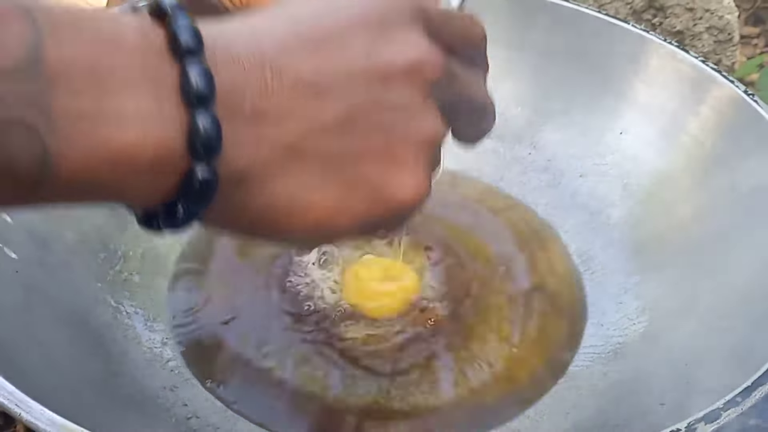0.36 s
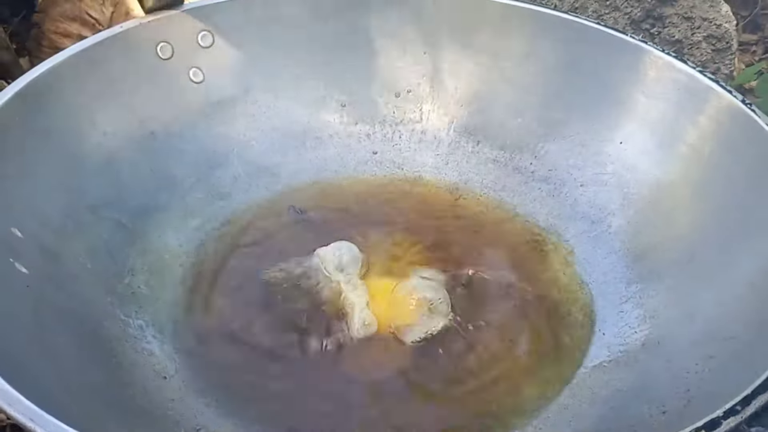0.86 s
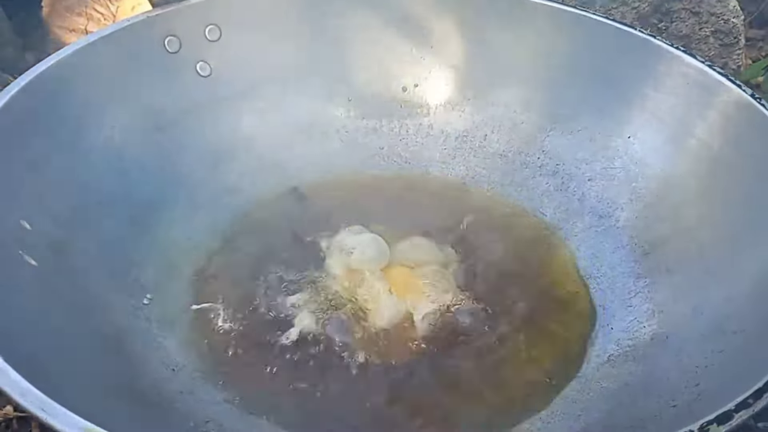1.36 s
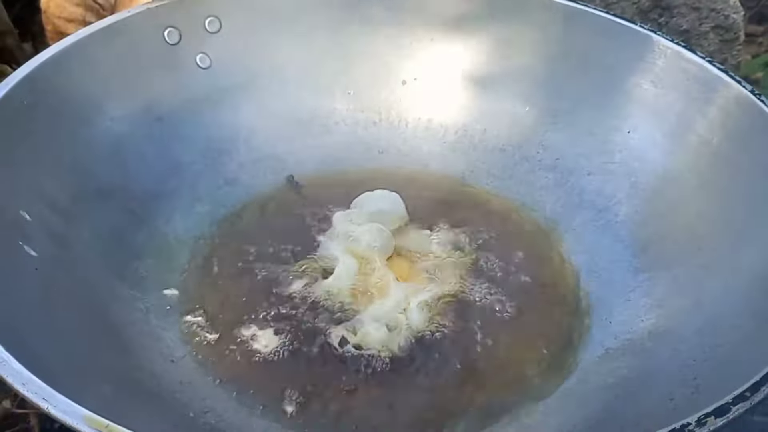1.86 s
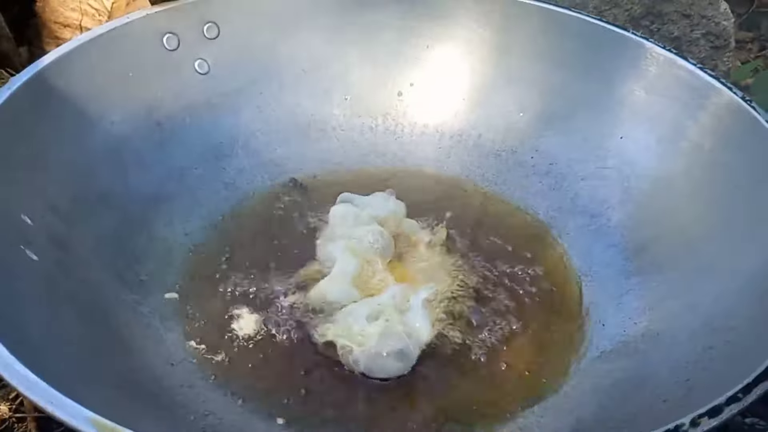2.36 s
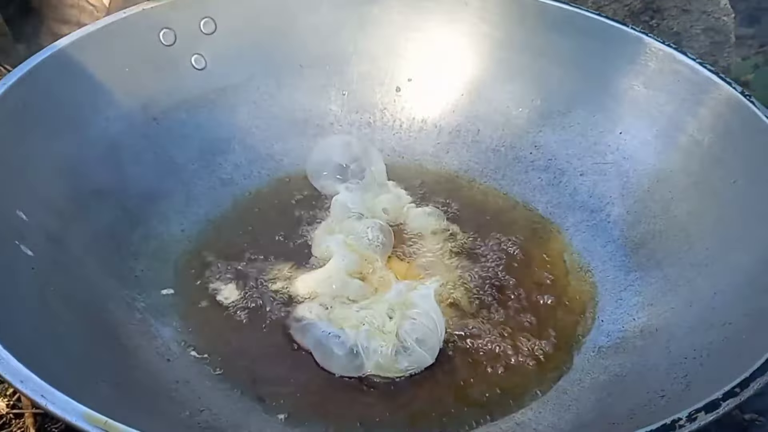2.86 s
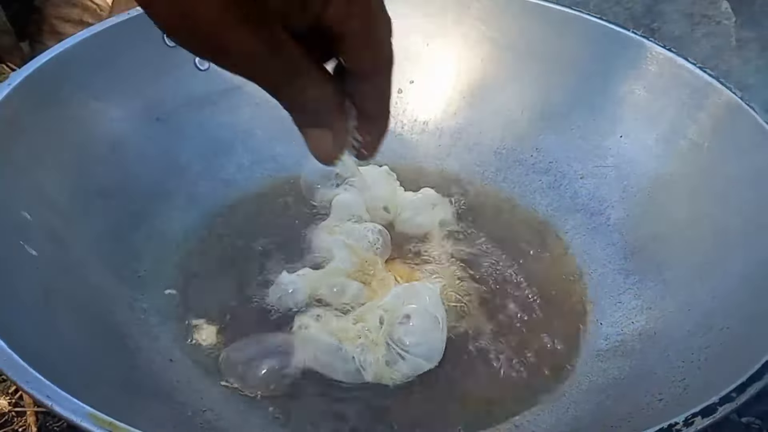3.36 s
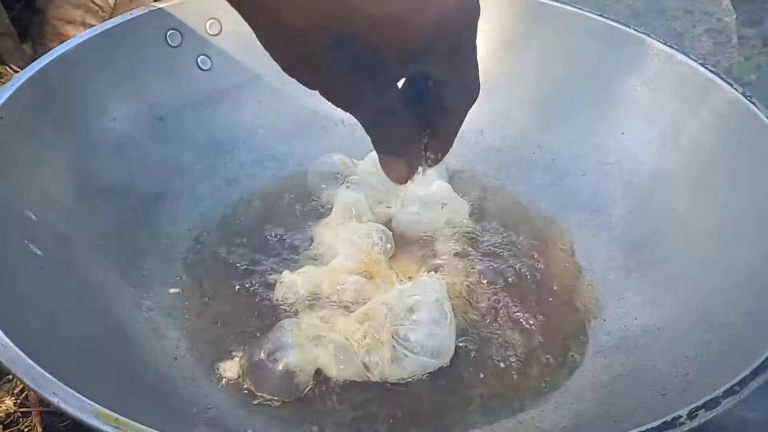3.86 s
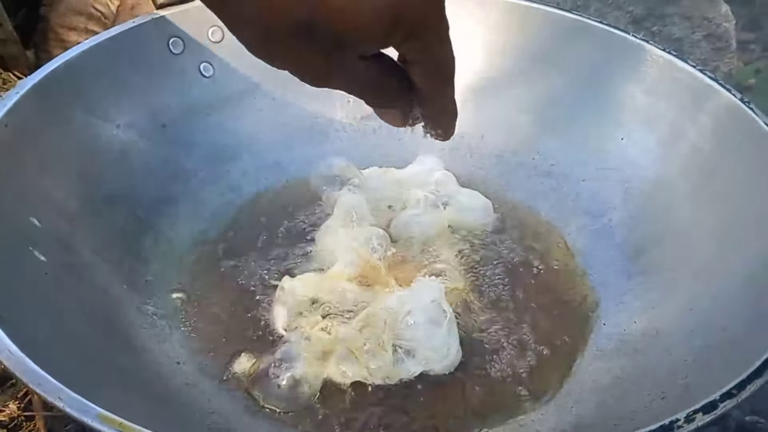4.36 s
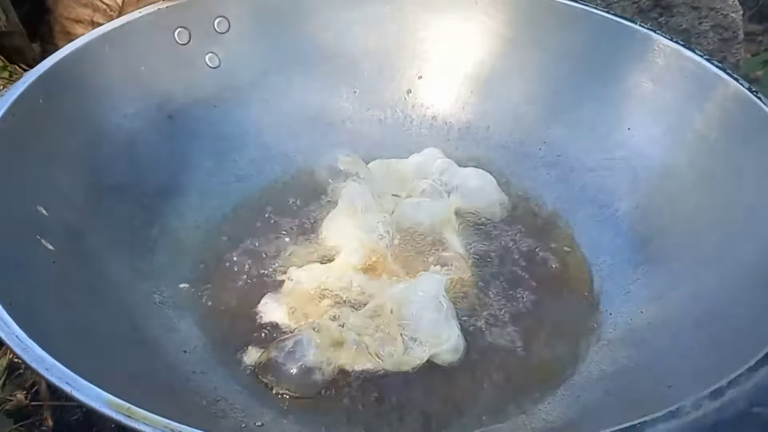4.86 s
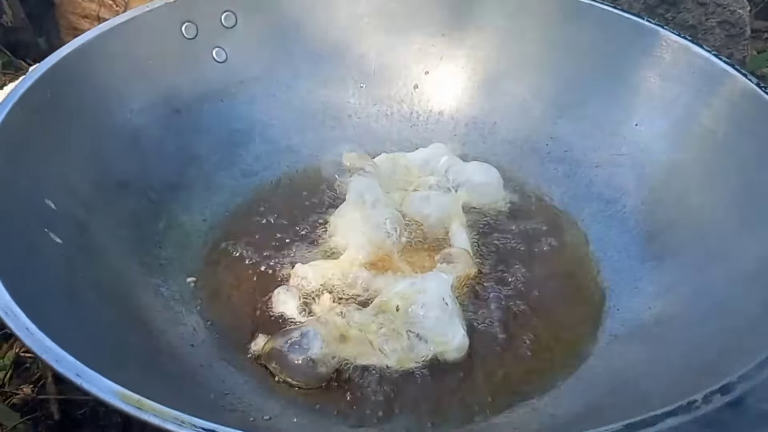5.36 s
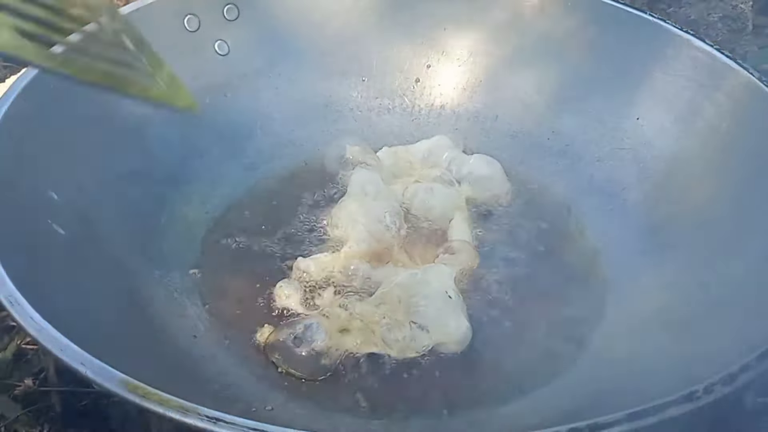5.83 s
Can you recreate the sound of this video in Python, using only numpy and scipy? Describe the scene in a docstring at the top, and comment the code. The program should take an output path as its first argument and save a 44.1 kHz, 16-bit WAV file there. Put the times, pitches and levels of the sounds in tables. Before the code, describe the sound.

Eggshell cracks with small hollow ticks over faintly fizzing oil, then the egg drops in and a dense, spitting sizzle erupts outdoors.

```python
"""A shell cracks in small hollow ticks over faintly fizzing oil; then an egg meets the oil and a dense, spitting sizzle
erupts, with popping bubbles and soft thumps of air. Two unlike microphone ports sit close to a wide metal pan outdoors.
Water flashing to steam is modelled as noise gated by tiny pops, power bursts for spits, and short rings for large
bubbles; trapped steam hums near one pitch. Low noise buffets the ports, and one droplet shoves the right one."""
import sys
import numpy as np
from scipy import signal
from scipy.fft import rfft, irfft
from scipy.io import wavfile
from scipy.ndimage import uniform_filter1d

SR = 44100
rng = np.random.default_rng(int(sys.argv[2]) if len(sys.argv) > 2 else 0)


def voltage_ratio(decibels):
    """Convert decibels (scalar or array-like) to amplitude ratios, 20 dB per decade."""
    exponent = np.asarray(decibels, float) / 20
    return 10 ** exponent


def dump(signal):
    """Clip the signal to [-1, 1] and save it as 16-bit WAV at the path in sys.argv[1]."""
    limited = np.clip(np.atleast_2d(signal).T, -1, 1)
    pcm = np.round(limited * 32767).astype(np.int16)
    wavfile.write(sys.argv[1], SR, pcm)


N = 263277
T = np.arange(N) / SR
HZ = np.fft.rfftfreq(N, 1 / SR) + 1  # the added 1 Hz keeps logarithms finite
SIDES = np.array([[.5], [-.5]])  # shares a left-minus-right difference in dB between the ports


def on_log(table, hz):
    """Logarithmic interpolation: reads a (Hz, value) table on a log-frequency axis."""
    return np.interp(np.log(hz), np.log(np.array(table)[:, 0]), np.array(table)[:, 1])


def unit(x):
    """Root-mean-square normalisation to 1."""
    return x / np.sqrt(np.mean(x ** 2))


def walk(rate):
    """Low-pass random modulation: levels held 1 / rate s and smoothed twice, rms 1."""
    hold = int(SR / rate)
    levels = np.repeat(rng.standard_normal(N // hold + 1), hold)
    return unit(uniform_filter1d(uniform_filter1d(levels, hold), hold)[:N])


def add(out, s, x):
    """Superposition: mixes x into out from time s."""
    i = int(np.clip(s * SR, 0, N))
    out[..., i:i + x.shape[-1]] += x[..., :N - i]


def ring(hz, length_s, glide):
    """Damped resonance: swells fast and dies slower, its pitch gliding steadily; envelope peak 1."""
    u = np.arange(int(3 * length_s * SR) + 2) / SR / (0.39 * length_s)  # 1 at the peak
    phase = 2 * np.pi * np.cumsum(hz * (1 + glide * (u - 1))) / SR
    return u * np.exp(1 - u) * np.sin(phase)


def crackle(rate, spread_db, fade_ms):
    """Shot noise: a gate of tiny pops at random times and of scattered size, each decaying exponentially."""
    size = voltage_ratio(spread_db * np.clip(rng.standard_normal(N), -2, 2))
    pops = size * (rng.random(N) < rate / SR)
    return unit(signal.lfilter([1], [1, -np.exp(-1000 / (fade_ms * SR))], pops))


def narrow(table, rate, pan_db, alike):
    """Quadrature modulation: slow noise on a carrier makes a narrow band whose centre and level follow the table."""
    s, hz, db = np.transpose(table)
    phase = 2 * np.pi * np.cumsum(np.interp(T, s, hz)) / SR
    both, left, right = (walk(rate) * np.sin(phase) + walk(rate) * np.cos(phase) for _ in range(3))
    level = voltage_ratio(np.interp(T, s, db, -120, -120) + SIDES * pan_db)
    return level * (alike * both + (1 - alike) * np.array([left, right]))


# Puffs of warm air. Each row: centre in seconds, level in dB before the common 5 dB lift,
# half-width in seconds (to 1/e of the power), left minus right in dB.
AIR_PUFFS = [(.25, -58, .05, -8), (0.5, -54, 0.12, -4), (0.807, -48, 0.059, -1), (1.063, -43.5, 0.05, 5),
             (1.205, -48, 0.033, -1), (1.436, -50.5, 0.083, 4), (1.75, -54, 0.048, 14),
             (2.05, -53, 0.27, -2), (2.5, -48, 0.035, -4), (2.685, -46, .018, 10), (2.845, -46, 0.017, 16),
             (2.884, -46, 0.018, 20), (2.963, -52, 0.014, 13), (3.05, -56.5, .1, 17),
             (3.384, -44, 0.031, 8), (3.546, -49.5, 0.087, 21.5), (3.836, -54, 0.019, 24),
             (4.032, -50.5, 0.06, 4), (4.14, -50, 0.024, -12), (4.322, -52, 0.046, 2),
             (4.503, -49.5, 0.052, 6), (4.77, -53, 0.065, 21), (5.876, -51, 0.029, -3)]
# Droplet landing on the right port. Each row: time in seconds, push in dB, delay of the spreading in ms,
# spreading in dB relative to the push.
DROPLET_PUSH = [(2.6040, 1.5, 7.8, -11)]
# The steady breeze: level at the start before the common lift, its drift, left minus right, wander
BREEZE_DB, BREEZE_FADE_DB_S, BREEZE_PAN_DB, BREEZE_WALK_DB = -56.5, -0.57, -2.5, 3


def port_air():
    """Turbulent pressure on the membranes: gusty rumble, partly unrelated left and right, and the droplet's shove."""
    breeze_db = BREEZE_DB + BREEZE_FADE_DB_S * T + SIDES * BREEZE_PAN_DB + BREEZE_WALK_DB * walk(13)
    power = voltage_ratio(2 * breeze_db)
    for s, db, length, pan in AIR_PUFFS:
        power = power + voltage_ratio(2 * (db + SIDES * pan)) * np.exp(-((T - s) / length) ** 2)
    eddies = rng.standard_normal((2, N)) + 1.4 * rng.standard_normal(N)
    rumble = signal.sosfilt(signal.butter(4, 135, fs=SR, output="sos"), eddies)
    gusts = np.sqrt(power) * voltage_ratio(0.86 * np.array([walk(12), walk(26)]))

    s, db, spread_ms, spread_db = DROPLET_PUSH[0]
    # it lands at once, then spreads and presses a little more
    landing = np.clip((T - s) / 0.0003, 0, 1)
    spread = np.sin(np.pi / 2 * np.clip((T - s - spread_ms / 1000) / 0.0087, 0, 1)) ** 2
    push = voltage_ratio(db) * (landing + voltage_ratio(spread_db) * spread)
    return voltage_ratio(5.0) * unit(rumble) * gusts - push * np.array([[.03], [1]])


# Frying levels before flicker. Each row: time in seconds, fizz in dB, gurgle in dB, bubbling in dB, steam hiss in dB.
FRY_LEVELS = [(0, -66, -78, -80, -63), (.19, -63.5, -82, -72, -71.5), (.28, -50, -84, -76, -57),
              (.315, -35.5, -75, -62, -44), (.335, -31, -57, -46, -40), (.46, -32.5, -49.5, -35.5, -42),
              (.58, -28, -42.5, -34, -38), (.72, -27.5, -43.5, -37, -37.5), (.86, -29, -42.5, -34.5, -39.5),
              (1.08, -30, -38.5, -33.5, -37.5), (1.45, -30, -41.5, -37.5, -37),
              (2.06, -32.5, -45, -37, -40), (2.43, -31.5, -44.5, -37, -35.5), (2.62, -31.5, -45, -39, -42),
              (3.01, -36.5, -48.5, -43.5, -38), (3.4, -36, -49.5, -43, -39), (3.56, -34, -48, -43, -43),
              (3.77, -36.5, -53.5, -40.5, -37.5), (4.04, -30.5, -52, -42, -34.5),
              (4.2, -29.5, -50.5, -36.5, -31.5), (4.33, -24.5, -53.5, -37, -28.5),
              (4.41, -24.5, -51, -35, -28), (4.52, -23.5, -49.5, -34.5, -29.5),
              (4.63, -29, -52.5, -40.5, -32.5), (4.72, -26, -56, -37.5, -28.5),
              (4.89, -22.5, -47.5, -32.5, -32.5), (4.93, -30, -53.5, -34.5, -34),
              (5.4, -34.5, -57.5, -43, -36), (5.52, -34.5, -54.5, -41, -39), (5.61, -36, -47, -43.5, -40),
              (5.8, -40, -59.5, -47.5, -40.5), (5.88, -35.5, -47.5, -43, -38),
              (5.97, -40.5, -53, -47.5, -43)]
# The burble lies between gurgle and bubbling, and comes up only as the white sets
BURBLE_SHARE, BURBLE_DB, RAW_DB, SETTING_S = 0.21, -2, -33, 0.96
FIZZ = 3  # place of the fizz among the five bubble sizes


def boil():
    """Bubble-size distribution: levels of five sizes, large to small, sample by sample (dB)."""
    s, *cols = np.transpose(FRY_LEVELS)
    fizz, gurgle, bubbling, hiss = (np.interp(T, s, c) for c in cols)
    raw_db = RAW_DB * np.exp(-(T / SETTING_S) ** 2)
    burble = gurgle + BURBLE_SHARE * (bubbling - gurgle) + BURBLE_DB + raw_db
    return [gurgle, burble, bubbling, fizz, hiss]


DENSE_DB, BLUR = -30.5, 0.54  # in a fizz louder than this, single grains stand out less, dB per dB


def blur(fizz_db):
    """Overlap of grains: the loss of prominence of the lesser ones in a dense boil (dB)."""
    return -BLUR * np.clip(fizz_db - DENSE_DB, 0, None)


# Spectral colour of the frying. Each row: frequency in Hz, relative density in dB per Hz.
FRY_SPECTRUM = [(120, -41), (200, -19), (283, -22), (316, -20.5), (360, -13.5), (394, -18.5), (821, -7),
                (1180, -5), (1340, -4), (1600, -1.5), (1960, 0), (2470, 2.5), (3830, 9.5), (5520, 8),
                (7500, 2.5), (8200, -2), (9300, 0.5), (10500, -2.5), (12400, 2), (15100, -6), (16000, -4)]
# Unlike responses of the ports. Each row: frequency in Hz, left minus right in dB.
PORT_DIFFERENCE = [(250, 2.5), (700, 3), (1100, 4.5), (1500, 6.5), (2000, 4), (2700, 3), (3500, -4.5),
                   (4500, -2), (6000, -6), (7500, 4.5), (8400, -17), (9100, -27.5), (10000, -1.5),
                   (12000, -12.5), (15500, -1.5)]
# Coherence of the ports. Each row: frequency in Hz, share of power common to both.
COMMON_SHARE = [(250, 0.92), (700, 0.96), (1500, 0.62), (3000, 0.89), (6000, 0.0095), (12000, 0.19)]


def froth(gate):
    """Partial coherence: spectra at the two ports of gated noise, partly common and partly their own."""
    both, left, right = rfft(rng.standard_normal((3, N)) * unit(gate))
    alike = np.clip(on_log(COMMON_SHARE, HZ), 0, 1)
    late = np.exp(-2j * np.pi * HZ * 3.06 / SR)  # the right port is 3.06 samples further off
    common = np.sqrt(alike) * both * np.array([1 + 0 * late, late])
    pair = common + np.sqrt(1 - alike) * np.array([left, right])
    ports = voltage_ratio(SIDES * on_log(PORT_DIFFERENCE, HZ))
    return pair * voltage_ratio(on_log(FRY_SPECTRUM, HZ)) * ports / np.sqrt(np.mean(ports ** 2, axis=0))


SPIT_BODY_DB, SPIT_BODY_OCTAVES = -16, 1.35  # a dull broad part under each spit
STEAM_LAG = 0.15  # steam swells over this share of the fall
# Froth thrown up round each large bubble
SPLASH_DB, SPLASH_OCTAVES, SPLASH_RISE_MS, SPLASH_FALL_MS = -4, 0.41, 2.4, 6.6


def vents(centres, rows):
    """Addition of powers: spits and large bubbles add humps round their pitch, and spits add steam in the treble."""
    power = np.zeros((len(centres), N))

    def hump(hz, octaves):
        """Resonance curve on a log-frequency axis, its band powers summing to 1."""
        h = np.exp(-(np.log2(centres / hz) / octaves) ** 2)
        return h / h.sum()

    def puff(s, gain, rise, fall):
        """Exponential growth and decay of power, 5.6 dB in each rise or fall time (ms)."""
        ms = np.arange(-int(3 * rise * SR / 1000), int(6 * fall * SR / 1000)) / SR * 1000
        envelope = np.exp(-1.3 * np.where(ms < 0, -ms / rise, ms / fall))
        add(power, s + ms[0] / 1000, gain[:, None] * envelope)

    for s, fizz_db, hiss_db, hz, rise, fall in rows:
        octaves = 0.35 + 0.42 / (1 + rise / 6.5)  # a sudden burst is broad, a slow jet sings near its pitch
        fizz = hump(hz, octaves) + voltage_ratio(2 * SPIT_BODY_DB) * hump(hz / 2, SPIT_BODY_OCTAVES)
        puff(s, voltage_ratio(2 * fizz_db) * fizz, rise, fall)
        steam = voltage_ratio(2 * hiss_db) * (centres > 8500) / 3  # shared by the top three bands
        puff(s + STEAM_LAG * fall / 1000, steam, rise + STEAM_LAG * fall, fall)
    for s, db, hz in LARGE_BUBBLES[1:]:  # the first rises before there is any froth
        splash_db = db + SPLASH_DB + 0.56 * np.log2(hz / 1000)
        puff(s, voltage_ratio(2 * splash_db) * hump(hz, SPLASH_OCTAVES), SPLASH_RISE_MS, SPLASH_FALL_MS)
    return power


# Moments when the froth quietens. Each row: centre in seconds, level change in dB, half-width in ms (to 1/e of the dB).
FROTH_LULLS = [(1.44, -10, 11), (1.665, -4, 9.2), (1.955, -2, 14), (2.245, -4, 9), (2.308, -6, 11),
               (2.445, -3, 13), (2.625, -15, 12), (3.565, -12, 9.5), (3.765, -10, 17), (5.645, -6, 10),
               (5.7, -6, 13), (5.755, -3, 8.3)]
# The fizz turns now brighter, now duller. Each row: time in seconds, tilt in dB per octave round 4.5 kHz.
TREBLE_TILT = [(0, 2), (1, -.5), (2, 0), (3, 3), (4, 2), (4.6, -3), (5.1, 1), (5.97, 6)]
LAYER_EDGES_HZ = (560, 900, 2500, 8000)  # between the five bubble sizes
SPIT_PATCHY = 0.16  # share of the froth's flicker in a spit


def sizzle(rows):
    """Band-wise modulation: third-octaves of crackling noise, neighbours flickering together as froth flares."""
    layer_db = boil()
    pops = crackle(rate=540, spread_db=3.5, fade_ms=1.0) + 0.42 * crackle(rate=49, spread_db=10.0, fade_ms=0.37)
    # each bubble size has pops of its own besides the common ones
    own_pops = ((60.0, 1.1), (101.6, 0.8), (900, 2.9), (450, 5.8), (1500, 0.55))  # (per second, fade ms)
    sizes = [froth(0.54 + 0.21 * pops + .5 * crackle(rate=rate, spread_db=5.0, fade_ms=ms))
             for rate, ms in own_pops]
    centres = 250 * 2 ** (np.arange(19) / 3)
    layer = np.searchsorted(LAYER_EDGES_HZ, centres)
    share = voltage_ratio(2 * on_log(FRY_SPECTRUM, centres)) * centres
    patches = [walk(35) for _ in range(len(centres) + 1)]
    flicker_db = 1.6 * voltage_ratio(0.44 * blur(layer_db[FIZZ]))  # a dense boil flickers less
    lull = sum(db * np.exp(-((T - s) * 1000 / ms) ** 2) for s, db, ms in FROTH_LULLS)
    tilt = np.interp(T, *np.transpose(TREBLE_TILT))
    flare, spit, out = walk(14), vents(centres, rows), 0
    for k, hz in enumerate(centres):
        window = np.cos(np.pi / 2 * np.clip(3 * np.log2(HZ / hz), -1, 1))
        band = unit(irfft(sizes[layer[k]] * window, N))
        patch = voltage_ratio(flicker_db * (patches[k] + patches[k + 1]))
        band_db = layer_db[layer[k]] + 0.5 * flare + lull
        band_db = band_db + (layer[k] == FIZZ) * tilt * np.log2(max(hz, 3400) / 4500)
        steady = voltage_ratio(2 * band_db) * share[k] / share[layer == layer[k]].sum()
        out = out + band * np.sqrt(steady * patch ** 2 + spit[k] * patch ** (2 * SPIT_PATCHY))
    return out * voltage_ratio(SIDES * (-2.2 + 1.4 * walk(19)))  # the froth wanders a little from side to side


# Echoes across the pan. Each row: delay on the left in ms, level in dB relative to the direct sound.
PAN_ECHOES = [(1.4, -17.5), (2.9, -33), (5.3, -19.5)]


def bowl(x):
    """Specular reflection: the curved metal throws each pop back a few times, a little later on the right."""
    out = x.copy()
    for ms, db in PAN_ECHOES:
        add(out[0], ms / 1000, voltage_ratio(db) * x[0])
        add(out[1], 1.3 * ms / 1000, voltage_ratio(db) * x[1])
    return out


# Oil ticking over before the egg. Each row: time in seconds, centre in Hz, level in dB.
SIMMER_BAND = [(0, 2590, -59), (.13, 2900, -61), (.2, 3200, -74), (.3, 3170, -68)]


def simmer():
    """Narrow-band noise: the quiet oil before the egg."""
    return narrow(SIMMER_BAND, 2500, -1, 0.26)


# Shell cracking. Each row: start in seconds, level of the note in dB, pitch in Hz,
# treble in dB relative to the note, its T60 in seconds.
SHELL_CRACKS = [(.0094, -35, 2280, -16, 0.026), (0.055, -31.5, 2650, -7, 0.016),
                (.105, -58, 1250, 0.5, .02), (.112, -52, 2750, -20, .04), (0.137, -40.5, 1300, 2, 0.044),
                (0.1652, -45, 1420, -5, 0.035), (.178, -52, 1350, -10, .015), (.187, -54, 1400, -14, .015),
                (.196, -45, 1500, -14, 0.024), (.203, -48, 1500, -15, .015), (.229, -61, 1550, -20, 0.017),
                (.246, -46, 1500, -20, 0.019), (.262, -50, 1600, -20, .03), (0.291, -27, 1600, -14, .012)]
# Brittle modes. Each row: frequency in Hz, level in dB, T60 in seconds; pitch and level scatter from crack to crack.
SHELL_MODES = [(2900, 2, 0.013), (3900, -0.5, 0.023), (4800, -5, 0.017), (6170, -1, 0.018),
               (6800, -4, 0.016)]


def shell():
    """Modal decay: each crack is one short hollow note and brittle modes, each with a slightly softened onset."""
    out, t = np.zeros(N), T[:SR // 20]
    onset = 1 - np.exp(-t / 0.00052)
    for s, db, hz, tick_db, t60 in SHELL_CRACKS:
        chance = rng.standard_normal((len(SHELL_MODES), 2))
        tick = sum(voltage_ratio(g + 2 * a) * np.sin(2 * np.pi * f * (1 + .02 * b) * t) * 1000. ** (-t / d)
                   for (f, g, d), (a, b) in zip(SHELL_MODES, chance))
        split = np.diff(rng.standard_normal(len(t) + 1)) * np.exp(-t / 0.0011)
        tick = tick + 0.68 * split
        note = np.sin(2 * np.pi * hz * t) * 1000. ** (-t / t60)
        add(out, s, voltage_ratio(db) * onset * (note + voltage_ratio(tick_db) * tick))
    return out


# First thread of white touching the oil. Each row: time in seconds, centre in Hz, level in dB.
THREAD_BAND = [(.2, 3900, -70), (.21, 4000, -45), (.225, 4500, -38), (.24, 4600, -59), (.255, 5210, -41),
               (.275, 5300, -45), (0.282, 5700, -39), (.3, 4980, -32), (.318, 4630, -46), (.33, 4600, -60)]


def thread():
    """Gated narrow-band noise: a thin fizz of separate pops."""
    return narrow(THREAD_BAND, 1500, -10.0, .2) * crackle(rate=300, spread_db=2.0, fade_ms=1.7)


# Loud blisters venting. Each row: peak in seconds, fizz in dB, steam hiss in dB, rise in ms, fall in ms
# (times for 5.6 dB; the steam rises a little slower).
LOUD_SPITS = [(.207, -54, -44, .4, 3), (.222, -52, -48, 5, 6.5), (.262, -47, -50, 5.5, 10),
              (.281, -57, -44, 1, 5), (0.293, -35, -40, 0.53, 15), (0.3229, -15.5, -29, .2, 1.5),
              (0.3253, -14, -34, 0.6, 1.8), (0.331, -20, -39, 3.4, 23), (.338, -20, -37, .5, 2.2),
              (.343, -17, -36, .4, 1.5), (.386, -22.5, -48, 11, 12), (.431, -30, -45, .8, 2.7),
              (0.503, -21.5, -33, .6, 6), (0.524, -18, -37, .8, 2.5), (0.553, -22, -27, .4, 6.3),
              (.575, -21, -46, 9.1, 4.8), (0.611, -20, -32, .8, 1.8), (.6205, -21, -38, .5, 1.5),
              (.696, -24, -17.5, 1.8, 2.6), (0.713, -22, -32, 0.67, 3), (0.765, -21, -37, .8, 2.1),
              (0.89, -21, -27.5, 2, 3.5), (0.922, -25, -77, 10, 4.3), (1.002, -26, -41, .8, 3.7),
              (1.019, -22, -23.5, 5.5, 4), (1.058, -19, -13.5, 2.7, 1.2), (1.09, -30, -30, 5, 5),
              (1.137, -27, -23, 5, 4), (1.149, -30, -18, 3, 1.5), (1.16, -27, -27, 2, 3),
              (1.249, -21, -24.5, 7.7, 5.3), (1.296, -19, -33, 1.2, 4.4), (1.316, -25, -28, 2, 2),
              (1.349, -19, -20, 2, 2.7), (1.381, -25, -27, 22, 4), (1.419, -22, -25, .6, 3),
              (1.43, -22, -20, 2.5, 1), (1.484, -24, -26, 0.84, 2.5), (1.509, -24.5, -18, 2.1, 7.2),
              (1.526, -29, -27, 8, 8), (1.622, -21, -27, 2, 4.4), (1.625, -11, -19, 0.46, 3.2),
              (1.644, -21.5, -34, 4.7, 7.3), (1.706, -18, -21, 0.59, 2), (1.718, -23, -27, 6, 2.7),
              (1.736, -35, -22, .8, 2.4), (1.794, -20.5, -28, 5.9, 4.2), (1.805, -12, -26, 1.2, 1.5),
              (1.82, -24, -44, 2.4, 6.6), (1.8345, -16, -22, .3, .8), (1.84, -14.5, -22, 1.7, 4),
              (1.868, -21, -53, 6.8, 5), (1.887, -16, -29, .4, 2.4), (1.898, -18, -26, 17, 7),
              (1.974, -18.5, -46, 0.25, 10), (2.02, -26, -27, 11, 15), (2.051, -16.5, -17, 2.8, 4.1),
              (2.087, -27, -38, 1.5, 2.5), (2.124, -23.5, -23.5, 3.9, 8.2), (2.148, -23, -27, 2.7, 19),
              (2.18, -24, -40, .8, 4), (2.216, -12.5, -37, 0.44, 3.4), (2.228, -12, -11.5, 3.5, 2.1),
              (2.261, -14, -16.5, 0.78, 4.1), (2.277, -26, -22, 2.1, 3.6), (2.292, -18, -20, 1.8, 2.7),
              (2.321, -12, -45, 0.21, 4.4), (2.347, -36, -18, .8, 2.4), (2.396, -16, -21.5, 4.4, 2.5),
              (2.418, -15.5, -43, 2.8, 7), (2.491, -18.5, -23.5, 5.5, 7.4), (2.539, -25.5, -33, 0.78, 5.3),
              (2.573, -20.5, -18.5, 3.8, 2.4), (2.604, -27, -21.5, 9.2, 2.2), (2.642, -25, -34, .4, 4),
              (2.685, -36, -23.5, 18, 25), (2.754, -19.5, -17, 1.7, 14.7), (2.798, -23, -37, 2.9, 9.4),
              (2.855, -32, -21, 11, 13), (2.924, -25.5, -24, 2, 4.9), (3.005, -48, -26.5, 4.3, 3.7),
              (3.065, -27.5, -35, 11, 13), (3.091, -20, -31, .8, 1.8), (3.097, -28, -30, .5, 1.5),
              (3.103, -26, -27, 1.5, 2.2), (3.155, -28, -28, .5, 9.2), (3.19, -34, -25, .3, 1.2),
              (3.233, -34, -28, 2, 15), (3.258, -25, -27, 9, 9), (3.273, -32, -31, 1, 2),
              (3.302, -36, -35, .4, 1.3), (3.333, -28, -27, .5, 2.3), (3.351, -24, -41, 0.87, 4.4),
              (3.434, -27, -22, .8, 6), (3.459, -26.5, -27, 7.3, 7.1), (3.515, -19.5, -25.5, 0.36, 8.3),
              (3.576, -28, -29, .3, 4), (3.602, -25, -23, 1.5, 8), (3.613, -20, -26, 5, 4),
              (3.623, -24, -24, 4, 2.5), (3.642, -24.5, -24, 10, 26), (3.74, -23, -17.5, 4.2, 4.3),
              (3.8, -31, -32, .8, 11), (3.855, -18, -19.5, 7.7, 9.1), (3.977, -24.5, -24, 11, 7.1),
              (4.035, -24, -32, 6.6, 8.2), (4.064, -13.5, -22, 0.3, 3.2), (4.077, -19.5, -17.5, 4.5, 5.7),
              (4.116, -32, -22, 7.3, 6), (4.135, -14.5, -17.5, 7, 1.8), (4.236, -21.5, -59, 4.6, 28),
              (4.495, -26, -22, 8, 4), (4.509, -22, -15, .6, 1.5), (4.516, -25, -24, 2, 4),
              (4.696, -26, -32, 22, 6), (4.72, -30, -22, 1, 2), (4.818, -30, -24, 2, 2),
              (4.989, -20, -59, 4.5, 3.6), (5.048, -29, -25.5, 3.5, 5), (5.185, -33, -27, .9, 14),
              (5.246, -25, -31, 20, 3.9), (5.342, -25, -28, 0.91, 5.7), (5.4845, -30, -20, .3, .8),
              (5.512, -27.5, -34, 19, 14), (5.548, -25, -18.5, 0.3, 2.2), (5.557, -30, -28, 1.5, 2.5),
              (5.575, -29, -23, 0.62, 2.7), (5.607, -30, -35, 2.5, 2.5), (5.661, -23.5, -24.5, 0.66, 4.3),
              (5.681, -30, -36, .4, 1.5), (5.719, -32, -22, .3, 1.5), (5.733, -26, -37, 7.4, 14),
              (5.78, -25, -16.5, 0.71, 1.7), (5.801, -35, -26, .3, .8), (5.822, -29, -34, .8, 2.5),
              (5.845, -30, -23, 3.6, 4), (5.853, -28, -29, 1.5, 3), (5.863, -19, -17.5, 0.82, 1.8),
              (5.869, -24, -32, 1, 2), (5.878, -23, -15, 0.7, 1.5)]
# Centre of the spitting. Each row: time in seconds, pitch in Hz before scatter.
SPIT_CENTRES = [(0.33, 4400), (.55, 4230), (0.81, 5140), (0.86, 3860), (0.95, 3700), (1.03, 5100),
                (1.16, 3900), (1.57, 4560), (1.6, 5150), (1.97, 3540), (2.29, 4600), (2.38, 3470),
                (2.52, 4000), (2.54, 4600), (2.79, 3500), (2.83, 4350), (3.06, 3600), (3.088, 5370),
                (3.11, 5350), (3.2, 3900), (3.43, 3820), (3.49, 3070), (3.55, 3830), (3.6, 2800),
                (3.7, 5160), (3.76, 3850), (3.85, 5600), (3.96, 4100), (4.07, 5200), (4.13, 4800),
                (4.25, 4270), (4.5, 5500), (4.7, 5000), (4.88, 4320), (5.01, 3220), (5.04, 4300),
                (5.48, 5060), (5.53, 4270), (5.6, 4900), (5.67, 3670), (5.71, 5300), (5.84, 4730),
                (5.89, 5440), (5.95, 4360)]
SPIT_OCTAVES_PER_DB, SPIT_SCATTER_OCTAVES = .004, 0.13  # the more steam, the higher the centre
# Lesser spits: level over the froth, random extra level, and the most that chance adds to rise and fall
LESSER_SPIT_DB, LESSER_SPREAD_DB, LESSER_RISE_MS, LESSER_FALL_MS = -2, 3, 72, 23


def spits():
    """Random point process: loud spits and a crowd of lesser ones that follows the froth, each with its pitch."""
    place, size, steam, rise, fall = rng.random((70, 5)).T
    froth_db = np.array(boil())[FIZZ:, (place * N).astype(int)]  # fizz and hiss
    froth_db = froth_db + LESSER_SPIT_DB + 1.7 * blur(froth_db[0])
    lesser = [place * N / SR, *(froth_db + LESSER_SPREAD_DB * np.array([size, steam])),
              4.5 + LESSER_RISE_MS * rise ** 3, 10.4 + LESSER_FALL_MS * fall ** 2]
    s, fizz_db, hiss_db, rise, fall = np.hstack([np.transpose(LOUD_SPITS), lesser])
    octaves = SPIT_OCTAVES_PER_DB * (hiss_db - fizz_db) + SPIT_SCATTER_OCTAVES * rng.standard_normal(len(s))
    hz = np.interp(s, *np.transpose(SPIT_CENTRES)) * 2 ** octaves
    return np.transpose([s, fizz_db, hiss_db, hz, rise, fall])


def snaps(rows):
    """Impulse excitation: a blister rings a few cycles at its own pitch, the louder the more suddenly it bursts."""
    out = np.zeros((2, N))
    for (s, fizz_db, hiss_db, hz, rise, fall), pan in zip(rows, 4 * rng.standard_normal(len(rows))):
        db = fizz_db + 0.47 - 0.98 * np.log2(1 + rise)
        sides = SIDES * (pan + on_log(PORT_DIFFERENCE, hz))
        add(out, s - .0004, voltage_ratio(db + sides) * ring(hz, 6.6 / hz, -0.034))
    return out


# Large bubbles ringing. Each row: time in seconds (just after the peak), peak in dB, pitch at the peak in Hz.
LARGE_BUBBLES = [(.3005, -21.5, 1600), (.335, -29, 1580), (0.341, -34, 1070), (.381, -31, 1120),
                 (.386, -30, 2800), (.553, -12.5, 4200), (.558, -20, 4250), (.564, -19, 4180),
                 (.611, -17.5, 4700), (.729, -34.5, 790), (0.786, -35, 1030), (.794, -25.5, 1490),
                 (.935, -28.5, 696), (.948, -26, 481), (.961, -21.5, 1470), (0.986, -24.5, 1540),
                 (1.01, -29, 900), (1.05, -26, 320), (1.05, -34, 450), (1.072, -22.5, 1690),
                 (1.077, -23, 310), (1.1, -30, 542), (1.316, -24, 3000), (1.498, -21, 1310),
                 (1.5, -21, 1580), (1.621, -24, 2120), (1.627, -24.5, 986), (1.648, -24.5, 974),
                 (1.779, -24, 1240), (1.839, -17.5, 2130), (1.84, -30, 1740), (1.872, -23, 1326),
                 (1.888, -19, 3520), (2.0, -24.5, 1540), (2.323, -19, 1237), (2.331, -31, 1200),
                 (2.486, -33, 950), (2.75, -22.5, 885), (2.755, -27, 577), (2.758, -20, 1040),
                 (2.759, -25.5, 2410), (2.801, -23.5, 1610), (3.336, -29.5, 863), (3.355, -29.5, 2140),
                 (3.357, -26.5, 1730), (3.484, -23, 2190), (3.491, -24.5, 1540), (3.506, -20, 2100),
                 (3.507, -27, 1320), (3.59, -33.5, 900), (3.607, -21, 2200), (3.614, -21, 2480),
                 (3.62, -25, 2280), (3.66, -32.5, 522), (3.896, -43, 1210), (3.916, -34, 1200),
                 (4.279, -32, 1100), (4.293, -38, 1120), (4.307, -35, 1100), (4.885, -27, 1160),
                 (4.993, -24, 2620), (5.179, -34, 985), (5.515, -28, 1596), (5.527, -33, 1620),
                 (5.538, -32, 1500), (5.627, -32, 1500), (5.663, -31, 1360), (5.869, -34, 2200)]
# Lesser bubbles, one row per bubble size. Each row: lowest pitch in Hz, highest pitch in Hz,
# peak over the froth in dB before colour and chance.
BUBBLE_CROWD = [(293, 633, -6), (526, 940, -3), (910, 2400, -4), (2423, 7500, -1), (9080, 15000, -4)]
BUBBLE_MS, BUBBLE_SLOPE = 8.3, -0.269  # ring length at 1 kHz, and its power law over pitch


def bubbles():
    """Bubble resonance: rings that rise in pitch nearing the surface; a random lesser crowd follows the boil."""
    out = np.zeros((2, N))
    rows = [(s, db, hz, BUBBLE_MS * (hz / 1000) ** BUBBLE_SLOPE, 0) for s, db, hz in LARGE_BUBBLES]
    levels = np.array(boil())
    levels = levels + blur(levels[FIZZ])
    counts = (200, 300, 1200, 2500, 2500)  # small ones are many
    for layer_db, (low_hz, high_hz, over_db), count in zip(levels, BUBBLE_CROWD, counts):
        place, pitch, size, cycles, side = rng.random((count, 5)).T
        hz = low_hz * (high_hz / low_hz) ** pitch
        tint = on_log(FRY_SPECTRUM, hz) + 10 * np.log10(hz)
        db = layer_db[(place * N).astype(int)] + tint - tint.mean() + over_db + 8 * size ** 2
        rows += zip(place * N / SR, db, hz, 1000 * (3.5 + 7 * cycles) / hz, 14 * (side - .5))
    for s, db, hz, ms, pan in rows:
        sides = SIDES * (pan + on_log(PORT_DIFFERENCE, hz))
        add(out, s - 0.0004804 * ms, voltage_ratio(db + sides) * ring(hz, ms / 1000, 0.011))
    return out


# Loud, sharp, broad clicks in the sizzle, many at the start of spits. Each row: time in seconds,
# impulse in dB before the spectral colour.
LOUD_CLICKS = [(0.3216, -8), (0.3374, -12), (0.343, -14), (0.6199, -12), (1.0025, -12), (1.0894, -16),
               (1.2196, -14), (1.2935, -13), (1.3478, -13), (1.4292, -10), (1.4914, -8), (1.6237, -7),
               (1.8048, -6), (1.8334, -7), (1.9729, -11), (2.2154, -9), (2.2608, -9), (2.3201, -9),
               (2.5395, -15), (3.0474, -19), (3.0894, -14), (3.1894, -17), (3.3014, -19), (3.4884, -16),
               (3.5154, -13), (3.7374, -13), (3.854, -9), (4.0622, -8), (4.4404, -13), (4.4814, -11),
               (4.5072, -7), (4.5374, -12), (4.5774, -10), (4.6794, -13), (5.0454, -12), (5.4834, -15),
               (5.5468, -14), (5.5745, -14), (5.7164, -14), (5.8004, -20), (5.8774, -11)]
CLICK_COLOUR_SHARE = 0.68  # how far a click takes on the frying colour
LESSER_CLICK_DB, LESSER_CLICK_SPREAD_DB = 8, 2.5  # over the fizz


def clicks():
    """Filtered impulses: loud broad clicks and a random lesser crowd that follows the fizz, each from its own side."""
    place, size = rng.random((250, 2)).T
    fizz_db = boil()[FIZZ][(place * N).astype(int)]
    lesser_db = fizz_db + blur(fizz_db) + LESSER_CLICK_DB - LESSER_CLICK_SPREAD_DB * np.log(size + .01)
    s, db = np.hstack([np.transpose(LOUD_CLICKS), [place * N / SR, lesser_db]])
    sign, pan = rng.standard_normal((len(s), 2)).T
    train = np.zeros((2, N))
    train[:, (s * SR).astype(int)] = np.sign(sign) * voltage_ratio(db + SIDES * 4 * pan)
    ports = voltage_ratio(SIDES * np.clip(on_log(PORT_DIFFERENCE, HZ), -12, 12))
    colour = voltage_ratio(CLICK_COLOUR_SHARE * on_log(FRY_SPECTRUM, HZ)) * ports * (HZ < 16000)
    return irfft(rfft(train) * colour / colour.mean(), N)


# Wet narrow band of the plunge. Each row: time in seconds, centre in Hz, level in dB.
PLUNGE_BAND = [(.322, 1160, -60), (.335, 1052, -38), (.35, 1065, -29), (.365, 1090, -36), (.382, 1085, -33),
               (.41, 1100, -45), (.45, 1100, -58)]


def plunge():
    """Narrow-band noise: a brief wet tone near 1.1 kHz."""
    return narrow(PLUNGE_BAND, 250, 3.3, 0.75)


# A second, lower steam pocket. Each row: time in seconds, pitch in Hz, level in dB before flutter.
LOW_POCKET = [(.48, 350, -55), (.53, 354, -43), (.555, 350, -50), (.585, 353, -37), (.62, 352, -41),
              (.65, 352, -55)]
# Steam pocket under the sinking egg. Each row: time in seconds, pitch in Hz, level in dB before flutter.
EGG_POCKET = [(.5, 562, -53), (.57, 561, -41.5), (0.626, 531, -56), (.65, 517, -25), (.672, 503, -45),
              (.7, 480, -24.5), (.73, 458, -50), (.757, 438, -23), (.775, 450, -44), (.79, 450, -27),
              (.81, 462, -36), (.835, 460, -31.5), (.87, 480, -45), (.92, 525, -43)]


def pocket(table):
    """Cavity resonance: trapped steam hums raggedly near one pitch, its level pumping."""
    s, hz, db = np.transpose(table)
    phase = 2 * np.pi * np.cumsum(np.interp(T, s, hz) * (1 + 0.0091 * walk(61.4))) / SR
    return voltage_ratio(np.interp(T, s, db, -120, -120) + 1.1 * walk(43.0)) * np.sin(phase)


# Wet band in the later boil. Each row: time in seconds, centre in Hz, level in dB.
WET_BAND = [(4.2, 1545, -53), (4.3, 1538, -47), (4.55, 1550, -39), (4.65, 1596, -50), (4.75, 1662, -33),
            (4.9, 1537, -37), (4.94, 1555, -46), (5.05, 1590, -46), (5.2, 1585, -48), (5.35, 1600, -58)]


def wet_boil():
    """Narrow-band noise: a wet colour near 1.6 kHz in the boil."""
    return narrow(WET_BAND, 450, 4, 0.67)


def scene():
    """Superposition of pan sounds, air on the ports and a faint outdoor floor."""
    rows = spits()
    pan = bowl(sizzle(rows) + snaps(rows) + clicks()) + bubbles()
    pan = pan + pocket(EGG_POCKET) + pocket(LOW_POCKET)
    pan = pan + simmer() + thread() + plunge() + wet_boil()
    floor = voltage_ratio(-91) * rng.standard_normal((2, N))
    return pan + shell() + port_air() + floor


def roll_off(x):
    """The treble ends steeply here."""
    return signal.sosfilt(signal.butter(12, 16810, fs=SR, output="sos"), x)


def record(dry):
    """High-pass filtering turns slow pushes into a falling thump; saturation rounds loud peaks and the top is cut."""
    low_cut = signal.butter(6, 47.7, "high", fs=SR, output="sos")
    top_cut = signal.ellip(8, .2, 70, 15600, fs=SR, output="sos")
    rounded = 0.9 * np.tanh(signal.sosfilt(low_cut, dry) / 1.318)
    mix = signal.sosfilt(top_cut, rounded)
    return roll_off(mix)


dry = scene()
out = record(dry)
dump(out)
```